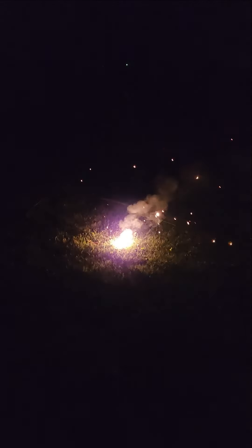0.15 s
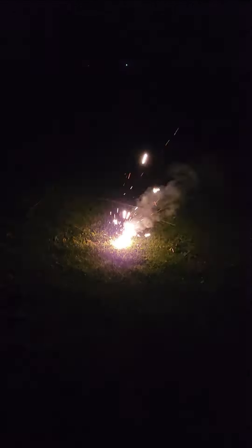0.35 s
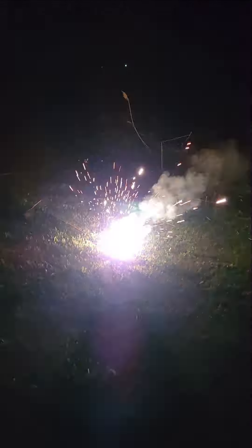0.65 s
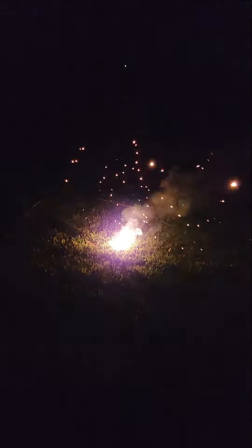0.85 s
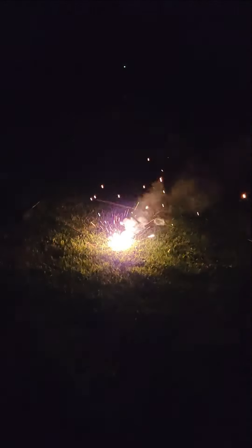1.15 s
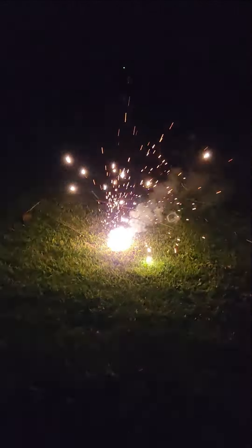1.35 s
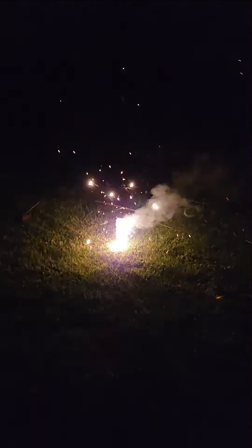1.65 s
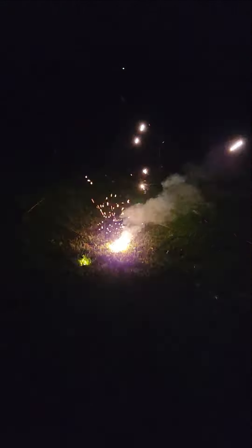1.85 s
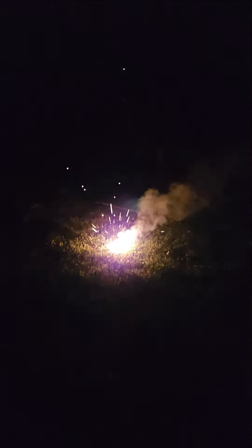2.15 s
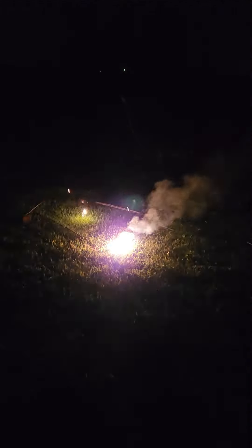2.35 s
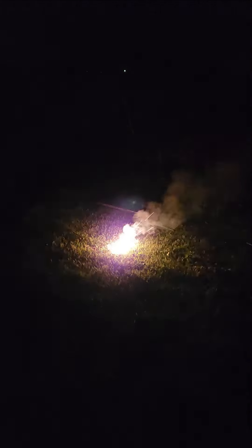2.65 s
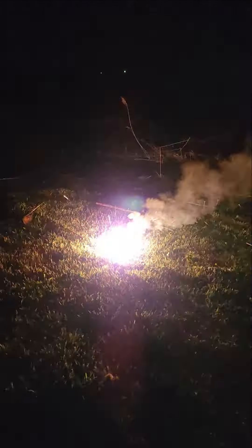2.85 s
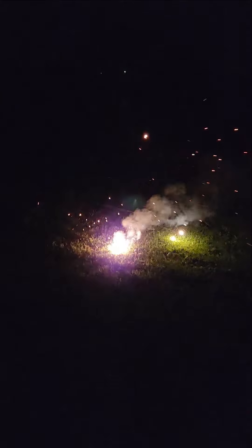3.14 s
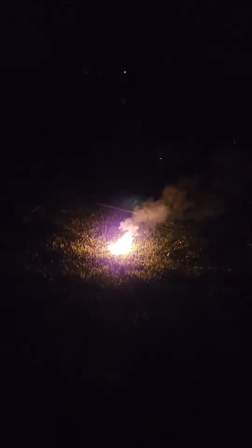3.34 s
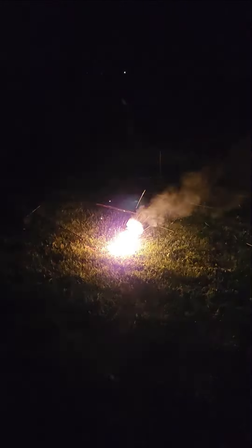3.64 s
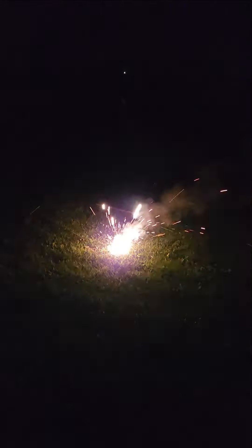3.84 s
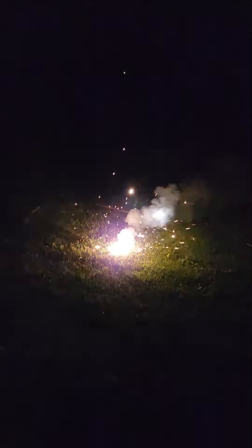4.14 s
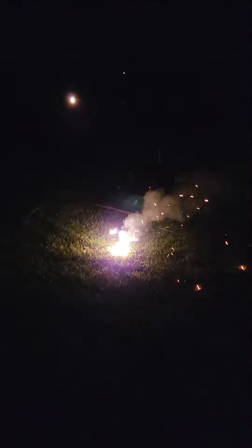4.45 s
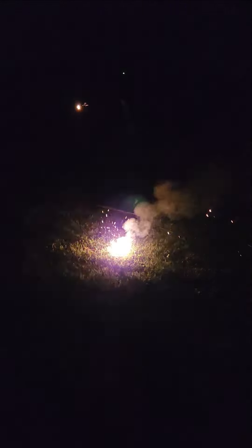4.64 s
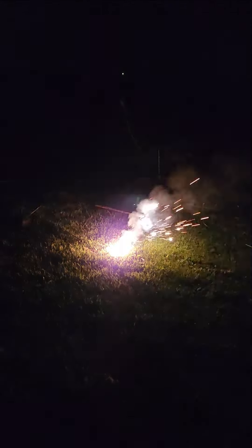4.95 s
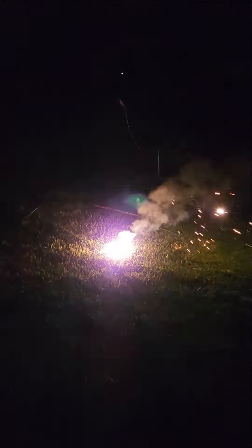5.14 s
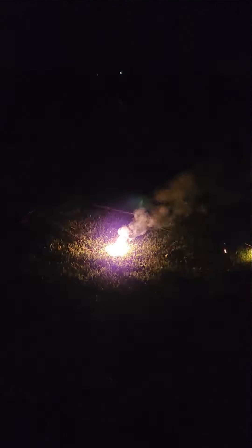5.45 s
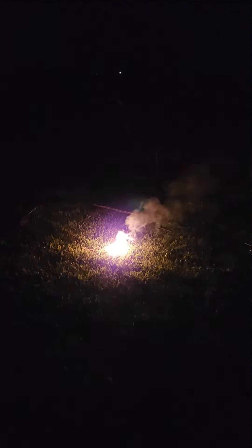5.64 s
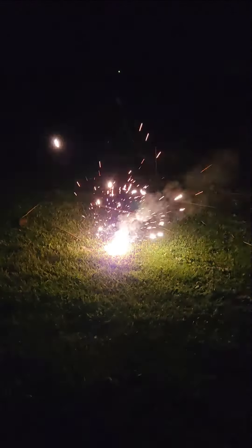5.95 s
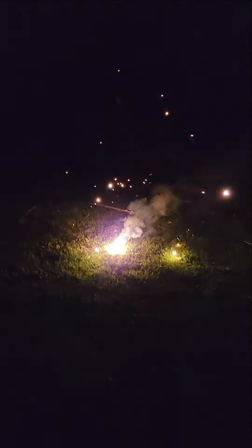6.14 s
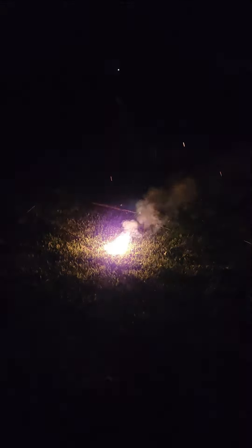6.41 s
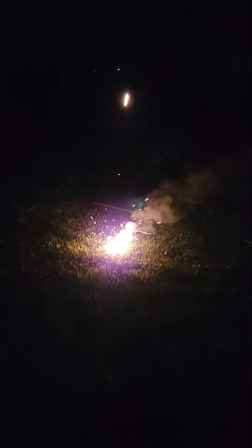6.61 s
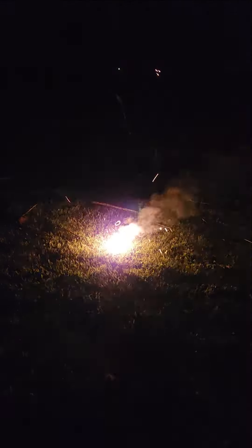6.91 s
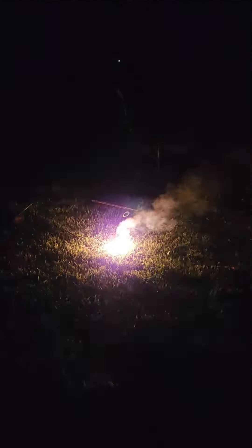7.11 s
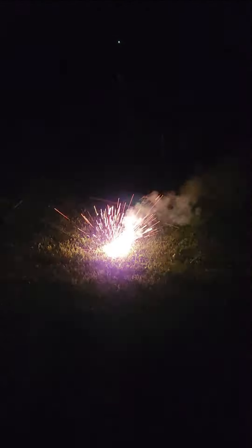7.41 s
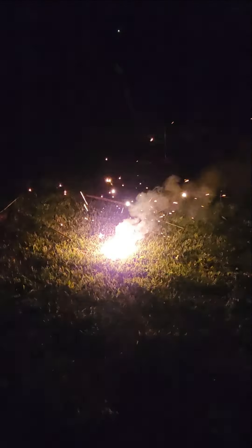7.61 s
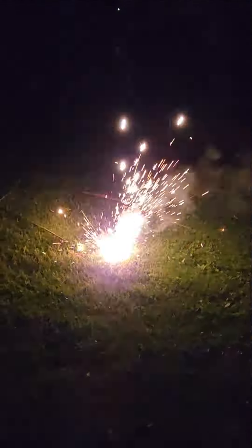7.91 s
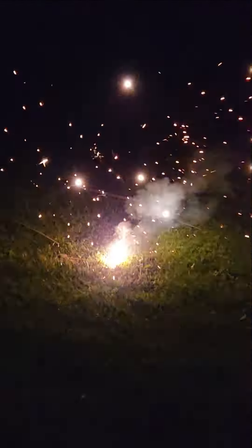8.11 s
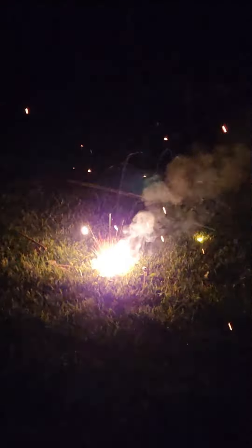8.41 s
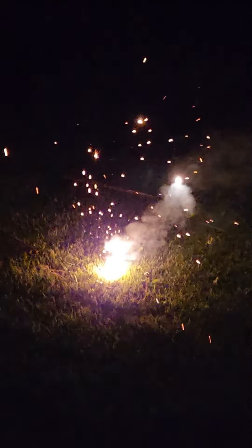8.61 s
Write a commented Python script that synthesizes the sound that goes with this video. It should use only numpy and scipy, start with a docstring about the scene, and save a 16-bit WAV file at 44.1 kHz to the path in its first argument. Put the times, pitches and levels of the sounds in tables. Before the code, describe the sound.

A ground firework on a lawn at night fires rapid, irregular sharp cracks and thumping pops over a faint flickering hiss.

```python
"""A ground firework burns on a lawn at night, a few metres from a small two-port microphone.
Flung stars burst as tiny blasts: a bright crack and a pressure thump, each doubled by a bounce off the grass.
Some tear apart in rushes of snaps. Shaped noise and hard reflections make the echoes of walls and trees.
Flickering noise is the flame's hiss; two faint gliding hoots and steady noise with far traffic rumble
make the night. The loudest blasts overload."""
import sys
import numpy as np
from scipy import signal
from scipy.fft import rfft, irfft
from scipy.io import wavfile

SR = 44100
rng = np.random.default_rng(int(sys.argv[2]) if len(sys.argv) > 2 else 0)


def voltage_ratio(level):
    """Linear amplitude factor for a level in decibels (scalar or array-like)."""
    return 10 ** (np.asarray(level, float) / 20)


def to_wav(s):
    """Save 16-bit WAV."""
    ch = np.atleast_2d(s).T  # columns
    pcm = np.round(np.clip(ch, -1, 1) * 32767)  # PCM
    wavfile.write(sys.argv[1], SR, pcm.astype(np.int16))


N = 386757

# bursting stars: start_s, crack_db, thump_db, bounce_lag_ms, trailing_treble_db (levels before filtering)
BURSTS = [(0, -23.5, -18.5, 0.74, 3), (.1912, -15, -7.5, 0.46, 4.5), (0.2, -14.5, -32, 0.41, -11),
          (0.2287, 3.5, -8, 0.19, -27), (.2593, -6, -2, .41, 4), (0.3034, -2.5, 0, .49, 5.5),
          (0.3134, -7.5, -21.5, 2.2, 4.5), (.3243, -21, -31, 1.3, -25), (.3359, -22, -14, .34, -18),
          (.433, -3.5, -2.5, 0.39, 13), (.5603, -14.5, -19.5, 0.66, -9), (0.5748, -20, -42, 0.73, -10),
          (0.7255, -8, -2.5, 0.5, 5.5), (.8714, 0.6, -17, 1.26, -8.5), (0.89, -26.5, -35, 0.17, -23),
          (.9107, -16.5, -35, 0.23, -29), (1.029, -5.5, -5, 0.51, 9), (1.0525, -13.5, -1, 0.4, -23),
          (1.057, -15, -39, 0.7, 2.5), (1.0635, 2.5, -11, 1.37, 1), (1.1891, -3.5, 1, 0.51, 7.5),
          (1.2446, -10.5, -2.5, 0.45, -6), (1.2638, -10.5, -23, 0.97, 0.2), (1.272, -12, -18, .18, -6),
          (1.2935, -14, -31, 1.3, -9.5), (1.2984, -2, -2.5, .36, 6.5), (1.354, -2.5, -12, 1.28, 2.5),
          (1.3583, 1.5, -19, .16, -29), (1.4479, -20, -14.5, .4, -12), (1.458, -14, -9, 0.45, -1),
          (1.4793, -15, -10, 0.25, 4.5), (1.5182, 2, -10.5, 1.17, -22), (1.5441, -11.5, -28.5, 0.21, -26),
          (1.6383, -29, -24, 1.14, -7.5), (1.652, -23.5, -41, 3.4, -28.5), (1.7757, -3, -4.5, 0.5, 6),
          (1.8332, -7.5, -6, 0.41, -2.5), (1.9248, -8, -2.5, 0.45, 2.5), (2.0612, -7, -6.5, 0.19, 1.5),
          (2.0849, 4.5, -9.5, .19, -5.5), (2.1188, -5, 2, 0.42, 10), (2.2255, -15.5, -22, 1.17, -26),
          (2.238, -20.5, -28.5, 1.2, -23), (2.3808, -15, -1.5, 0.41, 6), (2.4287, 1, -2.5, .59, 10),
          (2.457, 2.3, -9.5, 1.3, -10.5), (2.5603, 0, -2.5, .54, 13.5), (2.7273, -4, 2.5, 0.44, 15),
          (2.7481, -1.5, -19, 0.17, -27), (2.756, 0, -10, 1.16, -24.5), (2.8152, 3.5, -1.2, 0.33, 10.5),
          (2.8627, -2, -2, 0.45, 11), (2.9012, 1, -12.5, 0.63, -4.5), (2.9597, -4.5, -0.9, 0.47, 9.5),
          (3.087, -10.5, -1.5, 0.41, 1.5), (3.139, -0.5, -0.5, 0.67, 9.5), (3.2036, -5, -0.8, .48, 6),
          (3.216, 3, -17, 1.35, 4.5), (3.4325, 2, 1.5, 0.51, 10.5), (3.537, 1, -0.5, .51, 9),
          (3.555, -3, -2.5, 0.36, 8), (3.6002, -15.5, -11.5, 0.29, -4), (3.6419, -4.5, -1.5, 0.48, 9),
          (3.8026, -14, -17.5, 1.26, 3.5), (3.8397, -1.5, 3.5, .45, 12), (4.0596, -9.5, -7, 0.39, 14.5),
          (4.0635, 4.5, -0.5, 0.52, 11), (4.23, 5.5, -1.5, 0.54, 12.5), (4.2423, 1, 0, 0.52, 16.5),
          (4.31, -23.5, -12, 0.44, -23), (4.4007, 3, -14.5, .42, 5), (4.4725, 5, -28.5, 1.6, -20.5),
          (4.4956, 4.5, -31.5, 0.32, -2), (4.6264, 7.5, -27, 1.22, -3.5), (4.7961, 3.5, -37.5, .19, -21.5),
          (4.7998, 3, -4.5, 1.28, -9), (4.8742, -21, -32, 1.9, -7.5), (4.9033, 3.5, -4.5, 1.24, 0.5),
          (5.0201, 2, -15.5, 1.33, -6), (5.1855, .6, -8.5, 1.39, 3), (5.2497, -9.5, -6.5, .34, 6.5),
          (5.2834, -11, -9.5, 0.57, -3), (5.3805, 2, -7.5, 0.61, 3), (5.5072, 1.5, -10.5, 1.25, -27),
          (5.7393, -10.5, -1, 0.3, 8), (5.7695, 5.5, -12, 0.3, 6), (5.819, -20.5, -23.5, 1.2, -21.5),
          (5.905, -7, -4.5, 0.48, 2.5), (5.9765, -9.5, -3, 0.46, 3.5), (6.0524, 3.5, -15, .29, 1),
          (6.1008, -7.5, -1, 0.46, 6), (6.197, -6.5, -24, 1.13, -23.5), (6.2437, -5, 5.5, 0.46, 12),
          (6.297, 3.5, -9.5, 0.75, 5.5), (6.3221, 3, -6.5, 1.26, -12), (6.3743, -10, -19.5, .16, -2),
          (6.435, 1.5, -21, 1.17, -27), (6.512, -15, -8, 0.4, -7), (6.5187, 3, -12, 1.22, -1.5),
          (6.5464, -7.5, -2, 0.47, 6.5), (6.597, 5.5, -7, 0.15, -7), (6.642, -5, -10.5, 1.3, -11),
          (6.6483, -14, -5.5, 0.11, 6), (6.682, -10, -24, .2, -25), (7.202, -20.5, -14, 0.36, -9),
          (7.3527, -18.5, -20, .98, -26), (7.36, -1, 1, 0.46, 8), (7.3867, -7, -22, 1.13, -21),
          (7.58, -10.5, -6.5, 0.53, 6), (7.978, 4, -10, 0.21, 1.5), (8.0057, -20.5, -36, 1.2, -13),
          (8.0303, -4.5, -8, 0.35, 4.5), (8.1122, -5.5, -9.5, 0.17, -22), (8.1332, -12.5, -21, .17, -20),
          (8.149, -30, -32, 1.6, -25), (8.1693, -8.5, -14.5, 0.18, -26), (8.3056, -18.5, -15, 1.34, -16),
          (8.3692, 3, -11, 1.34, 3), (8.3884, -12.5, -25, 0.26, -4), (8.5555, -7.5, -9, .57, 3),
          (8.6863, -5.5, -16, 1.33, -4)]
ALOFT_DB = 3   # a burst whose crack tops its thump by more than this went off in the air


def butter(x, hz, kind, order=2):
    """Butterworth filter along time."""
    return signal.sosfilt(signal.butter(order, hz, kind, fs=SR, output="sos"), x)


def peaking(x, peaks):
    """Chain of peaking filters, each a resonance or a notch: centre_hz, width_hz, gain_db."""
    for hz, width_hz, gain_db in peaks:
        w, g = 2 * np.pi * hz / SR, voltage_ratio(gain_db / 2)
        q = np.sin(w) * width_hz / hz / 2
        middle = -2 * np.cos(w)
        x = signal.lfilter([1 + q * g, middle, 1 - q * g], [1 + q / g, middle, 1 - q / g], x)
    return x


def coloured(spectrum, alike_hz):
    """Stereo noise of rms 1, increasingly alike in both ports below alike_hz."""
    hz = np.fft.rfftfreq(N, 1 / SR) + 1
    point_hz, point_db = np.transpose(spectrum)
    gain = voltage_ratio(np.interp(np.log(hz), np.log(point_hz), point_db))
    alike = 1 / (1 + (hz / alike_hz) ** 2)
    mid, side = rfft(rng.standard_normal((2, N)))
    stereo = np.sqrt(1 + alike) * mid + np.sqrt(1 - alike) * side * [[1], [-1]]
    noise = irfft(gain * stereo, N)
    return noise / noise.std()


def add(out, piece, s):
    """Mixes a short piece in at s seconds."""
    i = max(round(s * SR), 0)
    out[..., i:i + piece.shape[-1]] += piece[..., :N - i]


def blast(t, length_s, suction=2.018):
    """Sudden overpressure that falls through zero into a suction and settles."""
    t = np.maximum(t, 0) / length_s
    return (t > 0) * (1 - t) * np.exp(-(t / suction) ** 2)


def thumps(bounce=0.56, soft_hz=1200, cut_hz=50):
    """The pressure pulse of each burst and its ground bounce; grass takes the edge off."""
    # low resonance and dip of the soft ground: centre_hz, width_hz, gain_db
    lawn = [(113.3, 200, 0.5), (227, 170, -3)]
    grass_ms, air_ms = 0.72, 0.98   # time to the zero crossing of the pulse
    out, t = np.zeros(N), np.arange(1, 700) / SR
    for s, crack_db, thump_db, lag_ms, _ in BURSTS:
        length_s = (air_ms if crack_db - thump_db > ALOFT_DB else grass_ms) / 1000
        pulse = blast(t, length_s) + bounce * blast(t - lag_ms / 1000, length_s)
        add(out, voltage_ratio(thump_db) * pulse, s)
    softened = butter(peaking(out, lawn), soft_hz, "low")
    return butter(softened, cut_hz, "high")   # a small blast has no deep bass


def shock_front(crack_db, splinter_db=-5.5, splinter_ms=0.93, shock_ms=0.04, steepen=0.15, spread_db=3.5):
    """A short stereo shock with bright decaying splinters, bounced off the case and hand before it dies."""
    # bounces off the case and hand: delay_ms, left_share, right_share
    case_bounces = [(0.202, -0.069, 1), (0.453, 0.47, -0.17), (0.619, -0.92, 0.42), (0.951, 0.66, -0.014)]
    t = np.arange(1, 300) / SR
    grit = rng.standard_normal((3, len(t)))
    grit = np.diff(0.8 * grit[0] + 0.6 * grit[1:], prepend=0)   # thin, bright, mostly shared by the ports
    shock_s = shock_ms / 1000 * voltage_ratio(-steepen * crack_db)        # stronger fronts arrive steeper
    front = blast(t, shock_s) + voltage_ratio(splinter_db) * grit * np.exp(-t * 1000 / splinter_ms)
    for late_ms, *share in case_bounces:
        late_ms = late_ms + rng.standard_normal() / 50          # the angle of arrival shifts each echo
        front += np.outer(share, blast(t - late_ms / 1000, shock_s))
    return front * voltage_ratio(spread_db * rng.standard_normal() * np.array([[0.5], [-0.5]]))


def cracks(bounce_db=-11.0):
    """Each shock front, then the same off the ground, shaded by the case for bursts in grass or in air."""
    # shading by the case, a left and a right list each: centre_hz, width_hz, gain_db
    in_grass = [
        [(930, 260, -0.5), (3270, 1170, 9), (5400, 410, -1.5), (7800, 1000, -2), (13500, 3000, -6.5)],
        [(1110, 900, -7), (2900, 2100, -4.5), (5400, 1500, 2.5), (8600, 1500, -4), (13500, 3000, -4)],
    ]
    in_air = [
        [(950, 400, -0.5), (2150, 2800, -7.5), (5400, 900, 3.5), (9460, 1500, 1.5), (15000, 2800, 1.5)],
        [(1400, 500, 2.5), (2200, 1400, 6), (4200, 1200, 2), (8800, 1200, 3.5), (15200, 2500, -3.5)],
    ]
    near = np.zeros((2, 2, N))   # grass or air, port, time
    for s, crack_db, thump_db, lag_ms, _ in BURSTS:
        aloft = int(crack_db - thump_db > ALOFT_DB)
        front = shock_front(crack_db)
        add(near[aloft], voltage_ratio(crack_db) * front, s)
        add(near[aloft], voltage_ratio(crack_db + bounce_db) * front, s + lag_ms / 1000)
    shaded = np.zeros((2, N))
    for stereo, shading in zip(near, (in_grass, in_air)):
        shaded += np.array([peaking(x, peaks) for x, peaks in zip(stereo, shading)])
    return butter(butter(shaded, 610, "high"), 13000, "low")


def yard_clicks():
    """The click of each burst as the yard hears it, source of the treble that trails it."""
    clicks = np.zeros(N)
    for s, _, _, _, treble_db in BURSTS:
        add(clicks, voltage_ratio(np.array([treble_db])), s)
    return butter(clicks, 490, "high")


def rushes(snaps_per_s=3000, size_db=6.0):
    """Stars that tear apart in a ragged rush of dense random clicks of uneven size."""
    # rushes of tiny snaps: start_s, length_ms, level_db (of the smallest snaps, before filtering)
    tears = [(1.265, 15, -28), (1.294, 5.6, -26), (1.449, 8, -38), (2.061, 12, -29.5), (8.134, 21, -31),
             (8.171, 14, -31.5), (8.306, 9, -30), (8.389, 7.4, -34)]
    level = np.zeros(N)
    for s, length_ms, level_db in tears:
        add(level, np.full(round(length_ms * SR / 1000), voltage_ratio(level_db)), s)
    chance, size, sign = rng.random(N), rng.exponential(1, N), rng.choice([-1, 1], N)
    snaps = (chance < snaps_per_s / SR) * sign * voltage_ratio(size_db * np.minimum(size, 3))
    return butter(level * snaps + 1e-18, 1200, "high")


def swells(t_ms, rows):
    """Envelope of several swells; the steeper loss of each row's two slopes governs."""
    total = 0
    for peak_ms, peak_db, rise, fall in rows:
        loss_db = np.maximum(rise * (peak_ms - t_ms), fall * (t_ms - peak_ms))
        total = total + voltage_ratio(peak_db - loss_db)
    return total


def yard(thump, crack, click, alike=1.0, first_echo_ms=2.78):
    """Countless small reflectors as noise responses shaped in time, plus a few hard walls."""
    # swells of scattered sound after a burst: peak_ms, peak_db, rise_db_per_ms, fall_db_per_ms
    # (where both slopes are negative, the first sets the fall and the second the rise)
    bass_echoes = [(9, -42.5, -2.5, -0.44), (98, -65, 0, 0.2)]
    crack_scatter = [(2.8, -39.5, 9, 4.5), (15, -70, 3, 0.19)]
    trailing_treble = [(7.3, -38.5, 0.87, 1.93), (22.1, -50.5, 0.27, 0.47), (104.6, -53, .3, 0.27),
                       (200, -77.5, 0.15, .06)]
    # single hard reflections: delay_ms, thump_db, dulled_crack_db, click_db
    hard_walls = [(4.774, -38.5, -37, -22), (12.63, -21.5, -40, -46), (22.5, -27, -29, -33),
                  (42.7, -29, -33.5, -33)]
    t_ms = np.arange(round(0.4 * SR)) * 1000 / SR
    noise = rng.standard_normal((4, 2, len(t_ms))) * (t_ms > first_echo_ms)
    noise[0] = alike * noise[3, 0] + (1 - alike) * noise[0]     # long waves reach both ports alike
    noise[1:3] *= rng.exponential(1, len(t_ms)) / np.sqrt(2)    # short waves return as separate, uneven glints
    bass = noise[0] * swells(t_ms, bass_echoes)
    scatter = noise[1] * swells(t_ms, crack_scatter)
    treble = noise[2] * swells(t_ms, trailing_treble)
    walls = np.zeros((1, len(t_ms)))
    for wall_ms, *back_db in hard_walls:
        for response, db in zip((bass, walls, treble), back_db):
            response[:, round(wall_ms * SR / 1000)] += voltage_ratio(db)
    dull_crack = butter(crack, 3000, "low")
    soft_click = butter(click, 16000, "low", order=1)           # air and leaves absorb the top
    echoes = signal.fftconvolve(thump[None], bass, axes=1)
    echoes += signal.fftconvolve(crack, scatter, axes=1)
    echoes += signal.fftconvolve(dull_crack, walls, axes=1)
    echoes += signal.fftconvolve(soft_click[None], treble, axes=1)
    return echoes[:, :N]


def flame(flicker_db=4.5, flicker_hz=25, sputter_db=1.5, sputter_hz=400):
    """Turbulent hiss of the jet, flickering slowly and sputtering fast."""
    # course of the hiss: time_s, level_db (before flicker and sputter)
    jet_level = [(0, -47), (.24, -63.5), (.45, -44), (.88, -68), (1.2, -44.5), (1.45, -52), (1.65, -69.5),
                 (1.9, -52), (2.4, -63.5), (2.58, -39.5), (3.0, -51.5), (3.9, -60.5), (4.3, -41),
                 (4.85, -56.5), (5.45, -49.5), (5.75, -69.5), (6.1, -51), (6.65, -54), (6.78, -77),
                 (7.5, -62.5), (7.75, -72), (8.38, -58.5), (8.77, -66)]
    # relative colour of the hiss: pitch_hz, density_db (per Hz)
    hiss_colour = [(180, -36), (300, 10.5), (1190, -10), (2140, -19.5), (2520, -10), (4910, 1),
                   (16000, -10.5)]
    s, level_db = np.transpose(jet_level)
    level_db = np.interp(np.arange(N) / SR, s, level_db)
    for depth_db, rate_hz in (flicker_db, flicker_hz), (sputter_db, sputter_hz):
        wobble = butter(rng.standard_normal(N), rate_hz, "low")
        level_db = level_db + depth_db * wobble / wobble.std()
    return voltage_ratio(level_db) * coloured(hiss_colour, alike_hz=503)


def hoots():
    """Two faint low hoots far away: a soft gliding tone, hoarse from a fast flutter."""
    # glide of the hoots: time_s, pitch_hz, level_db (before flutter)
    glide = [(7.861, 401, -93.5), (7.9, 380, -65), (7.96, 370, -64), (7.99, 367, -93), (8.43, 320, -94),
             (8.461, 427, -44), (8.49, 434, -50), (8.529, 388, -58), (8.56, 380, -90)]
    s, pitch_hz, level_db = np.transpose(glide)
    t, flutter = np.arange(N) / SR, butter(rng.standard_normal(N), 50, "low")
    hoarse = 1 + 0.5 * flutter / flutter.std()
    phase = 2 * np.pi * np.cumsum(np.interp(t, s, pitch_hz)) / SR
    return hoarse * voltage_ratio(np.interp(t, s, level_db)) * np.sin(phase)


def night(level_db=-54):
    """Steady night air: noise weighted to the bass, where far traffic rumbles."""
    # relative colour of the night: pitch_hz, density_db (per Hz)
    night_colour = [(18, -41.5), (30, 9), (98, 3), (473, -27.5), (2010, -29), (2830, -44), (4650, -43.5),
                    (14400, -22.5), (16000, -33.5)]
    return voltage_ratio(level_db) * coloured(night_colour, alike_hz=600)


def scene():
    """Bursts, their echoes, the flame and the night."""
    thump, click = thumps(), yard_clicks()
    crack = cracks() + rushes()
    return thump + crack + yard(thump, crack, click) + flame() + hoots() + night()


def swings(soft_hz=80, settle_hz=20):
    """Slow swing of the microphone after hard cracks: a soft push, then the offset settles with undershoot."""
    # pushes: crack_s, left_db, right_db (before filtering, scaled by the softening)
    pushes = [(1.359, -32, -18.5), (2.083, -17, -28), (2.905, -14, -20), (3.219, -24, -26),
              (4.401, -15.5, -22), (5.019, -13.5, -18.5), (5.38, -13, -21), (6.054, -23.5, -27),
              (6.3, -12.5, -22), (7.979, -32, -22), (8.111, -23, -26), (8.373, -26, -25)]
    out = np.full((2, N), 1e-18)
    for s, *level_db in pushes:
        add(out, voltage_ratio(np.array(level_db))[:, None] * SR / (2 * soft_hz), s + 0.0019)
    return butter(butter(out, soft_hz, "low"), settle_hz, "high", order=3)


def roll_off(x):
    """The treble ends steeply here."""
    return signal.sosfilt(signal.butter(12, 16660, fs=SR, output="sos"), x)


def record(dry, right_lag_ms=0.2, right_db=-1.5, bass_cut_hz=14, top_hz=16500):
    """Each port has its colour, the right one is farther off; bass and top are cut, overloads swing and clip."""
    # resonances and notches of the microphone ports: centre_hz, width_hz, gain_db
    left_port = [(781, 940, -6.5), (1270, 1296, 15.5), (5000, 300, 1.5), (5330, 440, -4.5),
                 (9116, 2400, 26), (9340, 1120, -34.5), (12200, 2800, 3)]
    right_port = [(681, 320, 7.5), (1482, 900, 1.5), (2186, 1580, 14), (2610, 1140, -9.5),
                  (5270, 4500, 2.5), (5940, 180, -5.5), (8600, 3600, 6), (10640, 1630, -25.5)]
    late = voltage_ratio(right_db) * np.roll(dry[1], round(right_lag_ms * SR / 1000))
    ports = np.array([peaking(dry[0], left_port), peaking(late, right_port)])
    moved = butter(ports, bass_cut_hz, "high") + swings()
    overloaded = np.clip(moved, -1.2, 1.2)
    top_cut = signal.cheby2(10, 50, top_hz, fs=SR, output="sos")   # 50 dB down from top_hz up
    mix = np.clip(signal.sosfilt(top_cut, overloaded), -1, 1)
    return roll_off(mix)


dry = scene()
out = record(dry)
to_wav(out)
```